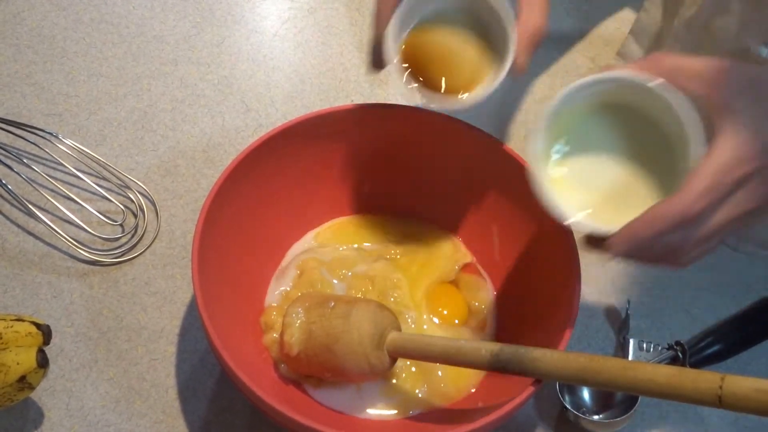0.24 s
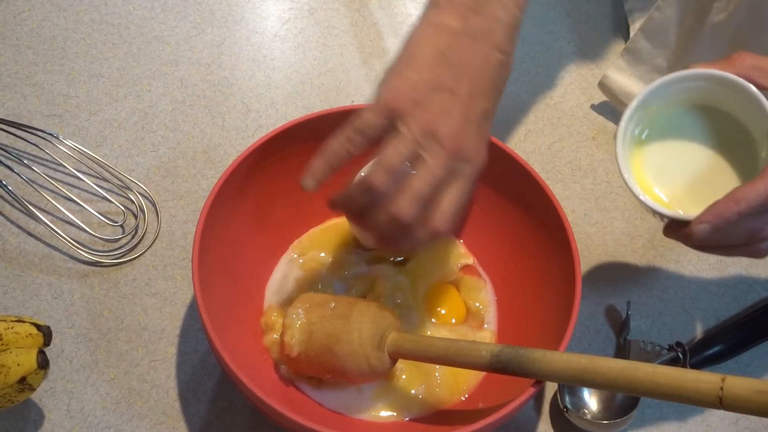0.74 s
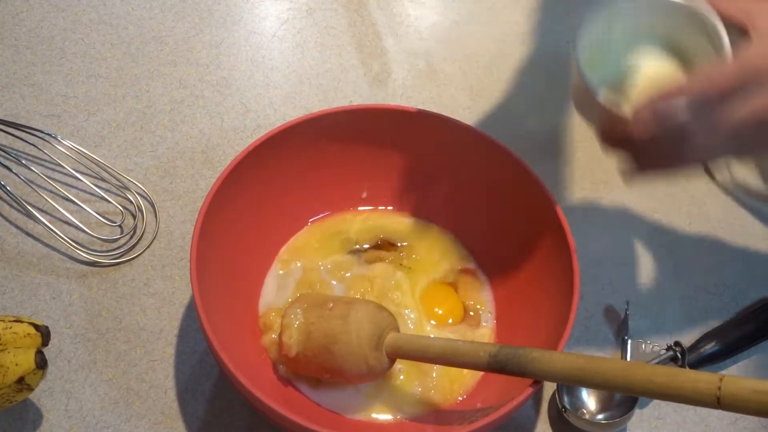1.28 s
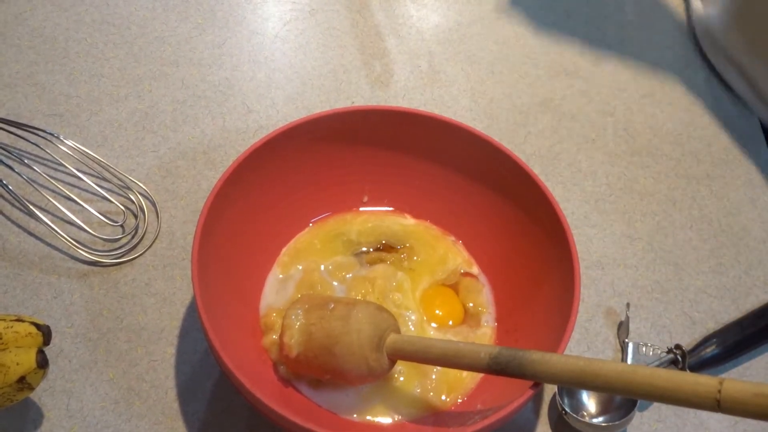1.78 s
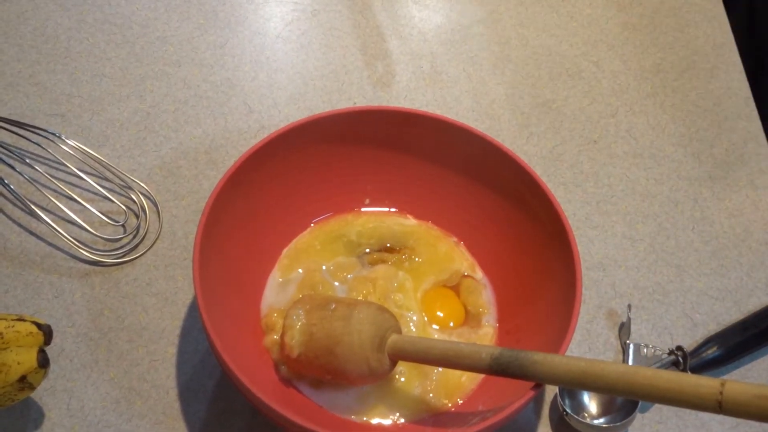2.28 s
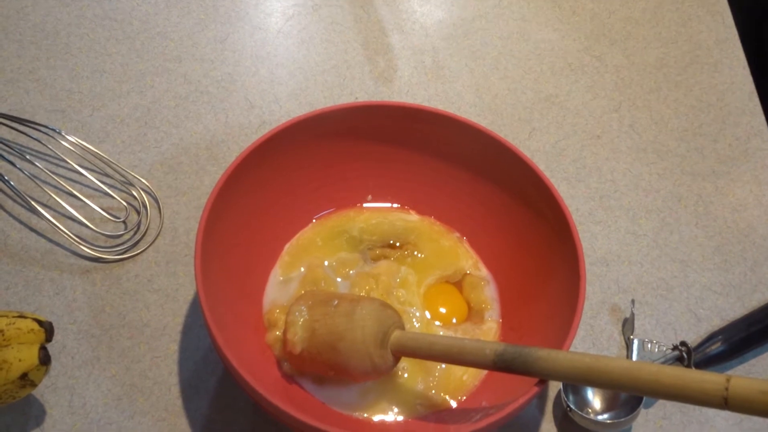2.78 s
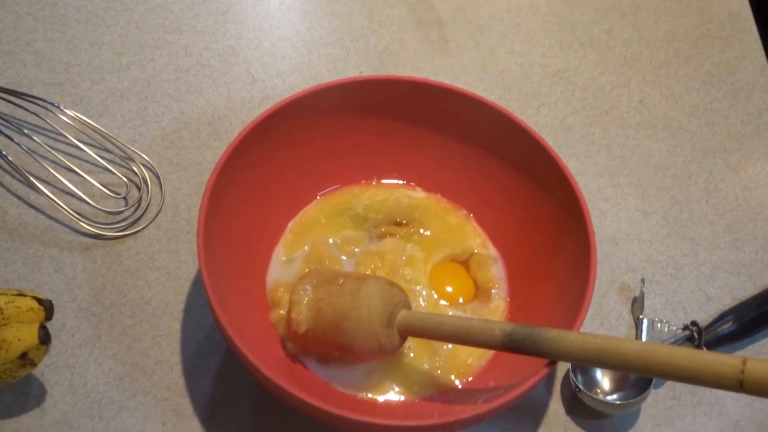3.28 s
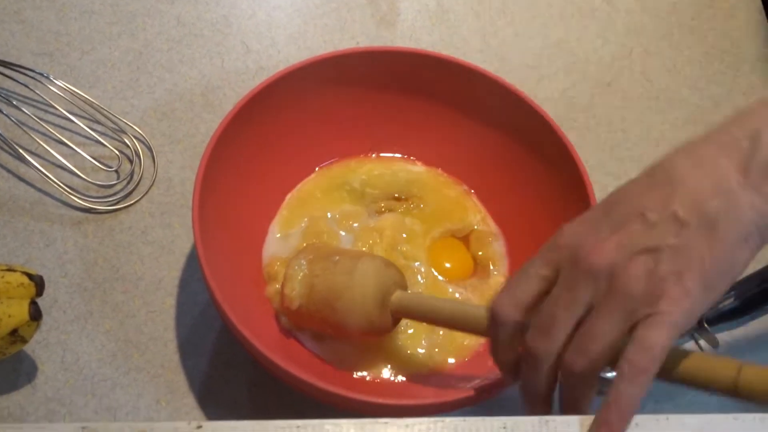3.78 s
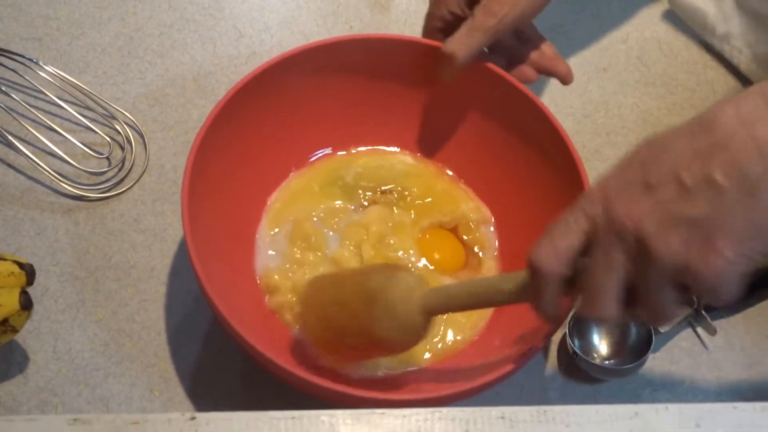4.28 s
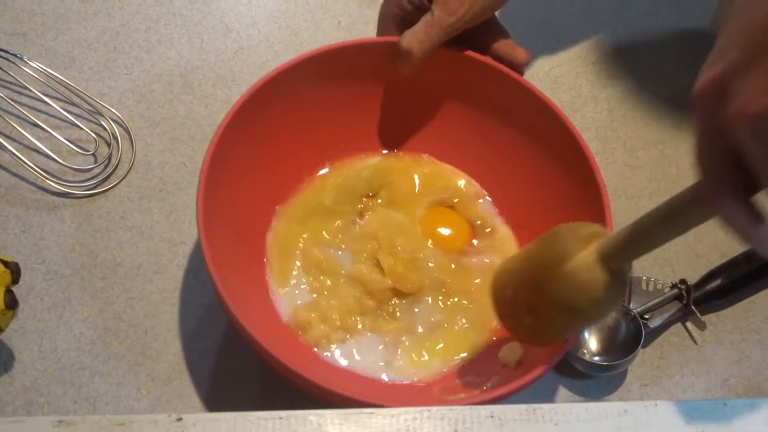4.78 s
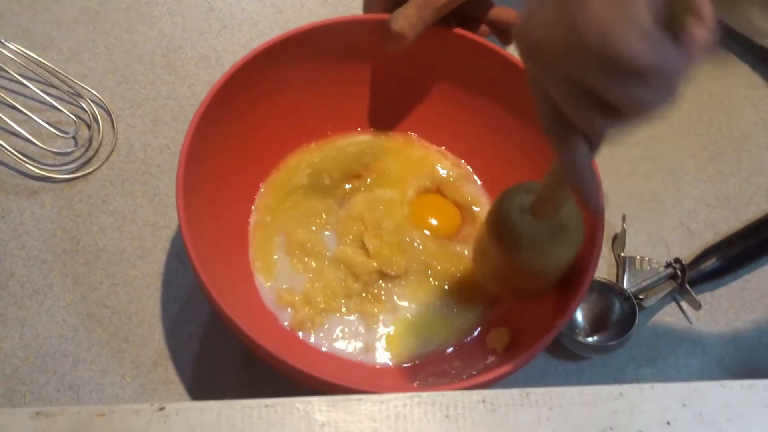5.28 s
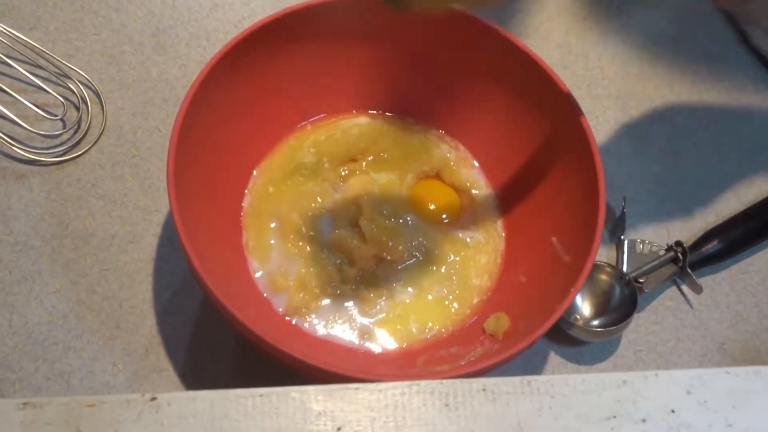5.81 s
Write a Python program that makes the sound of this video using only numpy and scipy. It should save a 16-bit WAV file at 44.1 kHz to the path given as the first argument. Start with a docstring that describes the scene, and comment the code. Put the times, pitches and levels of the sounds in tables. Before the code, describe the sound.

A soft, low room noise and a faint wavering appliance hum run throughout in a small, hard-walled kitchen, heard closely. Around 0.5 and 0.65 seconds there are barely audible handling ticks. At 1.85 a bright, dry ceramic clink rings out, followed near 2.05 by a rapid cluster of lighter clinks and a dull touch as small dishes are stacked. At 3.15 the stack is set down with a hard, rattling double clack, and a lower counter knock follows at 3.27. Tiny ticks at 4.0 lead to light bowl bumps at 4.1, a faint steel tinkle and another bump at 4.3, over a soft wet wooden slide lasting until 4.7. Then a loud, hollow plastic double knock booms at 4.73. Weak bumps and short rough brushes continue to 5.2, before a crisp wood-on-plastic double rap at 5.55. Its echo fades into the room noise until about 6 seconds.

```python
"""Faint ticks of handling come first in a quiet kitchen, then two small ceramic dishes are stacked and set down.
Next a wooden pestle is lifted from a plastic bowl, brushes a steel scoop, slides along the wall and raps the rim.
Each knock is a set of fading tones plus a noisy crack; each slide is shaped noise that follows the stroke's speed.
Hard walls answer every knock with echoes and a tail. Room noise and an appliance's hum last throughout."""
import sys
import numpy as np
from scipy import signal
from scipy.fft import rfft, irfft, next_fast_len
from scipy.io import wavfile
from scipy.ndimage import map_coordinates

SR = 44100
rng = np.random.default_rng(int(sys.argv[2]) if len(sys.argv) > 2 else 0)


def dump(signal):
    """Clip the signal to [-1, 1] and save it as 16-bit WAV at the path in sys.argv[1]."""
    limited = np.clip(np.atleast_2d(signal).T, -1, 1)
    pcm = np.round(limited * 32767).astype(np.int16)
    wavfile.write(sys.argv[1], SR, pcm)


def attenuation_scalar(level_db):
    """Turn a level in dB into a linear amplitude multiplier (20 dB per decade)."""
    decades = np.asarray(level_db, float) / 20
    return 10 ** decades


N = 266805  # length in samples


def dishes():
    """Both dishes ring at every touch; set down, the stack crashes and the counter answers low."""
    # dishes touching: start_s, large_dish_db, small_dish_db, contact_ms
    clinks = [(1.855, -8.5, -55, 0.1), (2.035, -30.5, -32, 0.25), (2.0555, -40.5, -21.5, 0.049),
              (2.0676, -22.5, -28, 0.12)]
    # tones of the large dish: pitch_hz; then level_db, t60_s (time to fade by 60 dB)
    large_hz = [1020, 1500, 2420, 2700, 2788, 3605, 4500, 5905, 6400, 6487, 7876, 9410, 11020, 13410, 15400]
    large_fading = [(-1, 0.012), (-16, 0.041), (-14, 0.028), (-2.5, 0.11), (2, 0.044), (-3.5, 0.054),
                    (-12, 0.045), (-7, 0.084), (10, 0.017), (3, 0.055), (-9.5, 0.13), (-15.5, 0.069),
                    (-10, 0.0595), (-26.5, .12), (-25, 0.041)]
    # tones of the small dish: pitch_hz; then level_db, t60_s
    small_hz = [2745, 3628, 4085, 4172, 5593, 6433, 8850, 11060, 12100, 13430, 15400]
    small_fading = [(5.5, 0.046), (-6, 0.2), (-5, .05), (-8.5, .05), (-4.5, 0.1), (1.5, 0.019), (1, 0.08),
                    (-1, 0.075), (-12.5, .05), (-20.5, .1), (-25, 0.049)]
    # the stack meeting the counter: start_s, rattle_db, counter_db, contact_ms
    landings = [(2.073, -64, -18, 1), (2.0795, -60, -23, 1), (3.155, -20.5, -13.5, 0.13),
                (3.161, -23.5, -22.5, 0.16), (3.272, -49, -13, 0.47)]
    # tones of the rattling stack: pitch_hz, level_db, t60_s
    stack_modes = [(1573, 7.5, 0.041), (1758, 0.5, 0.052), (2260, -3, 0.031), (2795, 3, 0.074),
                   (3536, 2, 0.082), (3920, -2.5, .06), (4517, -6, 0.2), (5690, 14, 0.016),
                   (9000, -19, 0.049)]
    # tones of the counter: pitch_hz, level_db, t60_s
    counter_modes = [(363, -11, 0.088), (440.4, 3, 0.046), (507, -7.5, 0.015), (735, -6.5, 0.04),
                     (605, -5, .04), (1583, -22, 0.037)]

    large_modes = np.column_stack((large_hz, large_fading))
    small_modes = np.column_stack((small_hz, small_fading))
    hits = []
    for s, large_db, small_db, ms in clinks:
        large = ring(large_modes, large_db, ms, crack_db=5, crack_s=0.014, crack_hz=6960)
        small = ring(small_modes, small_db, ms, crack_db=10, crack_s=0.012, crack_hz=11760)
        pair = band_pass(large + small, low_hz=700, high_hz=17270)
        pair = band_pass(pair, low_hz=690, high_hz=17770)
        hits.append((s, kitchen(pair, tail_db=2), -1.2))
    for s, rattle_db, counter_db, ms in landings:
        crash = ring(stack_modes, rattle_db, ms, crack_db=22.5, crack_s=0.019, crack_hz=9000)
        crash = band_pass(crash, low_hz=940, high_hz=12000)
        knock = ring(counter_modes, counter_db, ms, crack_db=10.5, crack_s=0.041, crack_hz=2470)
        knock = band_pass(knock, low_hz=328, high_hz=3000)
        hits.append((s, kitchen(crash + knock, tail_db=4.5), .1))
    return hits


def pestle():
    """At each rap the bowl booms, the wood clacks and the counter takes a thump."""
    # pestle against the bowl: start_s, bowl_db, pestle_db, bowl_contact_ms
    raps = [(4.088, -27, -35, 0.68), (4.095, -22.5, -60, 0.61), (4.139, -21.5, -49, 0.4),
            (4.298, -20, -58, 0.62), (4.7271, -4, -22.5, 0.75), (4.74, -5, -29, 0.91),
            (4.854, -26, -31, 0.39), (4.858, -28, -43, 0.38), (5.5466, -9.5, -8, 0.64),
            (5.5528, -20, -22.5, 0.35)]
    # tones of the plastic bowl: pitch_hz, level_db, t60_s
    bowl_modes = [(151, -22.5, 0.16), (244.2, -5.5, 0.11), (287, -6.5, 0.058), (338.6, -17, 0.42),
                  (394, -4, 0.04), (481, -3.5, 0.04), (582, 4.5, 0.029), (711, 8, 0.016), (874, 1, 0.02),
                  (1125, -4, 0.021), (1527, -1, 0.017), (1815, 3.5, 0.0074), (2500, 8, 0.0039),
                  (3530, -8, 0.0091)]
    # tones of the wooden pestle: pitch_hz, level_db, t60_s
    pestle_modes = [(2273, 0, .02), (2960, -10, .01), (3700, -7, 0.013), (5400, -6, .004),
                    (7500, -26, .003)]
    # low tone of the thumped counter: pitch_hz, level_db, t60_s
    thump_modes = [(80.4, 0, 0.35)]

    hits = []
    for s, bowl_db, wood_db, ms in raps:
        boom = ring(bowl_modes, bowl_db, ms, crack_db=6, crack_s=0.036, crack_hz=6100)
        boom = band_pass(boom, low_hz=149, high_hz=9000)
        clack = ring(pestle_modes, wood_db, 0.21, crack_db=4.5, crack_s=0.011, crack_hz=8400)
        clack = band_pass(clack, low_hz=896, high_hz=12000)
        thump_db = -47 + .25 * bowl_db  # a harder rap thumps only a little more
        thump = ring(thump_modes, thump_db, 6.3, crack_db=-50, crack_s=.01, crack_hz=300)
        thump = band_pass(thump, low_hz=54.7, high_hz=200)
        hits.append((s, kitchen(boom + clack + thump, tail_db=1.5), .3))
    return hits


def slide():
    """Wet wood on plastic: an uneven hiss and a rougher rumble of the bowl follow the speed of each stroke."""
    # strokes, with levels at top speed: start_s, length_s, hiss_db, rumble_db
    strokes = [(4.111, .62, -50, -51), (4.833, 0.18, -58, -44), (4.96, 0.256, -63, -44)]
    # colour of the hiss: pitch_hz, level_db (per Hz, relative)
    hiss_colour = [(700, -29), (1500, -2.5), (3500, -0.5), (6000, -7), (9800, -13), (13000, -25),
                   (15800, -28.5)]
    # colour of the bowl's rumble: pitch_hz, level_db (per Hz, relative)
    rumble_colour = [(120, -25), (300, 1.5), (750, 4), (1200, -8), (2200, -10), (4000, -39)]

    t = np.arange(N) / SR
    start_s, length_s, hiss_db, rumble_db = np.transpose(strokes)[:, :, None]
    progress = np.clip((t - start_s) / length_s, 0, 1)
    speed = np.abs(np.sin(np.pi * progress)) ** 0.98  # speeds up, then slows down

    mid = unit(coloured(hiss_colour, N))
    side = unit(coloured(hiss_colour, N))
    stereo = mid + attenuation_scalar(-18) * np.array([side, -side])
    hiss = (attenuation_scalar(hiss_db) * speed).sum(0) * attenuation_scalar(0.8 * wobble(30)) * stereo
    rumble_gain = (attenuation_scalar(rumble_db) * speed).sum(0) * attenuation_scalar(2.0 * wobble(37))
    return hiss + rumble_gain * unit(coloured(rumble_colour, N))


def small_things():
    """The scoop tinkles once; fingers and dishes leave faint ticks, each a single short tone with a crack."""
    # the touch on the scoop: start_s, level_db, contact_ms
    nudge = (4.1385, -42, 0.091)
    # tones of the steel scoop: pitch_hz, level_db, t60_s
    scoop_modes = [(2620, -2.5, 0.25), (5070, -14, 0.09), (7000, -1, 0.019)]
    # ticks of handling: start_s, pitch_hz, level_db, t60_s
    ticks = [(.521, 2180, -39.5, 0.016), (.655, 2200, -42, 0.023), (3.993, 2800, -41, 0.009),
             (3.995, 4150, -41, 0.015), (5.305, 9000, -53.5, 0.0037)]

    s, db, ms = nudge
    tinkle = ring(scoop_modes, db, ms, crack_db=3, crack_s=0.0061, crack_hz=9000)
    tinkle = band_pass(tinkle, low_hz=1980, high_hz=10000)
    hits = [(s, kitchen(tinkle, tail_db=6.0), .3)]
    for s, hz, db, t60 in ticks:
        tick = ring([(hz, db, t60)], 0, 0.044, crack_db=db - 13, crack_s=0.0044, crack_hz=9000)
        tick = band_pass(tick, low_hz=1500, high_hz=14000)
        hits.append((s, kitchen(tick, tail_db=-13), .3))
    return hits


def air():
    """Nearly steady room noise, shaped by pitch and a little different left and right, over a wavering mains hum."""
    # colour of the room noise: pitch_hz, level_db (per Hz, relative)
    air_colour = [(15, -50), (30, -39), (84, -17), (99, -30), (117, -4), (166, -10.5), (190, -3),
                  (242, -2.5), (373, -4.5), (439, -5.5), (591, -6.5), (1040, -12), (1520, -15), (4610, -29),
                  (9000, -36), (16000, -47.5)]
    # left-right difference of the noise: pitch_hz, side_minus_mid_db
    air_side = [(60, -2.5), (110, -14.5), (200, -17.5), (380, -15), (700, -15), (1290, -15), (2380, -5),
                (4400, -7.5), (8120, -23), (15000, -2)]
    # tones of the hum: pitch_hz, level_db (rms, before the wavering)
    hum_tones = [(120, -62.5), (240, -62.5)]

    mid = coloured(air_colour, N)
    side_colour = [(hz, db + along(air_side, hz)) for hz, db in air_colour]
    side = coloured(side_colour, N)
    gain = attenuation_scalar(-49.5 + .6 * wobble(7.8)) / mid.std()
    noise = gain * np.array([mid + side, mid - side]) * attenuation_scalar([[.15], [-.15]])

    t = np.arange(N) / SR
    hum = np.zeros(N)
    for hz, db in hum_tones:
        strength = np.sqrt(2) * attenuation_scalar(db + 2.6 * wobble(8))
        hum += strength * np.sin(2 * np.pi * hz * t + .9 * wobble(10))
    return noise + hum


def ring(modes, db, contact_ms, crack_db, crack_s, crack_hz):
    """One push drives fading tones and a noisy crack; a longer contact smooths the push and sounds duller."""
    t = np.arange(SR // 2) / SR
    hz, level_db, t60 = np.transpose(modes)[:, :, None]
    sign = (-1) ** np.arange(len(modes))[:, None]
    swing = sign * attenuation_scalar(level_db + rng.normal(0, 1, hz.shape))
    # a random wander of each tone's phase makes the ring slightly rough and blurred in pitch:
    # .17 radians per root of a cycle
    wander = .17 * np.sqrt(hz / SR) * rng.standard_normal((len(modes), len(t))).cumsum(1)
    tones = swing * attenuation_scalar(-60 * t / t60) * np.sin(2 * np.pi * hz * t + wander)
    body = tones.sum(0)
    crack = attenuation_scalar(crack_db - 60 * t / crack_s) * rng.standard_normal(len(t))
    crack = band_pass(crack, 20, crack_hz)
    push = np.exp(-np.arange(SR // 100) / (SR * contact_ms / 1000 / 4))
    push = np.convolve(push, push)  # rises smoothly, then fades
    return attenuation_scalar(db) * signal.fftconvolve(body + crack, push / push.sum())[:len(t)]


def kitchen(hit, tail_db):
    """Adds wall echoes and a fading noise tail to the direct sound; only the reflections differ left and right."""
    # how long the tail lasts: pitch_hz, t60_s
    tail_fading = [(100, 0.43), (300, 0.44), (1000, 0.48), (3000, 0.5), (7000, 0.4), (14000, 0.52)]
    # colour of the tail against the direct sound, before tail_db: pitch_hz, level_db
    tail_colour = [(150, 2), (600, -3), (2500, -2), (7000, -7), (14000, -16.5)]
    # left-right difference of the tail: pitch_hz, side_minus_mid_db
    tail_side = [(200, -36.5), (600, -26), (2000, -17), (6000, -15), (14000, -15)]
    first_ms, spread, wall_db = 6, 1.3, -15.5  # first echo, each delay over the last, echo level

    hz, t, z = signal.stft(rng.standard_normal((2, SR * 3 // 4)), SR, nperseg=256)
    t60 = along(tail_fading, hz)[:, None]
    energy_one = np.sqrt(2 * np.log(1000) / SR / t60)  # makes long and short tails equally strong
    z = z * energy_one * attenuation_scalar(tail_db + along(tail_colour, hz)[:, None] - 60 * t / t60)
    z[1] *= attenuation_scalar(along(tail_side, hz))[:, None]
    tails = signal.istft(z, SR, nperseg=256)[1]
    tail_s = np.arange(tails.shape[1]) / SR
    mid, side = tails * (1 - np.exp(-(tail_s / .012) ** 2))  # the tail builds up

    mid[0] += 1  # direct sound
    for k in range(8):
        delay = round(first_ms * spread ** k * SR / 1000)
        mid[delay] += (-1) ** k * attenuation_scalar(wall_db)
        # two opposite samples cancel in the bass, so the sides differ in the treble
        side[delay:delay + 2] += rng.choice([-1, 1]) * attenuation_scalar(wall_db - 8.5) * np.array([1, -1])
    return signal.fftconvolve(hit[None], [mid + side, mid - side], axes=1)


def band_pass(x, low_hz, high_hz):
    """Small things radiate no bass and far things lose their top: keeps the band between two pitches."""
    return signal.sosfilt(signal.butter(3, [low_hz, high_hz], "bandpass", fs=SR, output="sos"), x)


def coloured(points, length):
    """Random noise whose spectrum follows (Hz, dB) points."""
    m = next_fast_len(length + 8192)
    spectrum = rfft(rng.standard_normal(m)) * attenuation_scalar(along(points, np.fft.rfftfreq(m, 1 / SR)))
    return irfft(spectrum, m)[:length]


def wobble(rate):
    """A smooth random curve through this many random knots a second."""
    knots = rng.standard_normal(int(N * rate / SR) + 4)
    return map_coordinates(knots, [np.arange(N) * rate / SR])


def along(points, hz):
    """Reads a curve of (Hz, value) points, with pitch on a log axis."""
    f, v = np.transpose(points)
    return np.interp(np.log(hz + 1), np.log(f + 1), v)


def unit(x):
    """Scales a sound to rms 1."""
    return x / np.sqrt(np.mean(x ** 2) + 1e-20)


def add(out, s, sound):
    """Mixes a sound in at time s, in seconds."""
    part = out[:, round(s * SR):][:, :sound.shape[1]]
    part += sound[:, :part.shape[1]]


def scene():
    """Places every knock (time, sound in the room, left minus right dB) over the slides and the room noise."""
    out = air() + slide()
    for s, sound, lean_db in dishes() + pestle() + small_things():
        add(out, s, sound * attenuation_scalar([[lean_db / 2], [-lean_db / 2]]))
    return out


def band_limit(x):
    """A steep low-pass at the top of the band."""
    return signal.sosfilt(signal.butter(12, 16520, fs=SR, output="sos"), x)


def record(dry):
    """Rounds off the loudest peaks, then removes everything from the band limit up."""
    full_scale, knee, top_hz = .95, 6, 15800  # a higher knee bends more sharply
    held = dry / (1 + np.abs(dry / full_scale) ** knee) ** (1 / knee)
    m = next_fast_len(N)
    below_top = np.fft.rfftfreq(m, 1 / SR) < top_hz
    mix = irfft(rfft(held, m) * below_top, m)[:, :N]
    return band_limit(mix)


dry = scene()
out = record(dry)
dump(out)
```